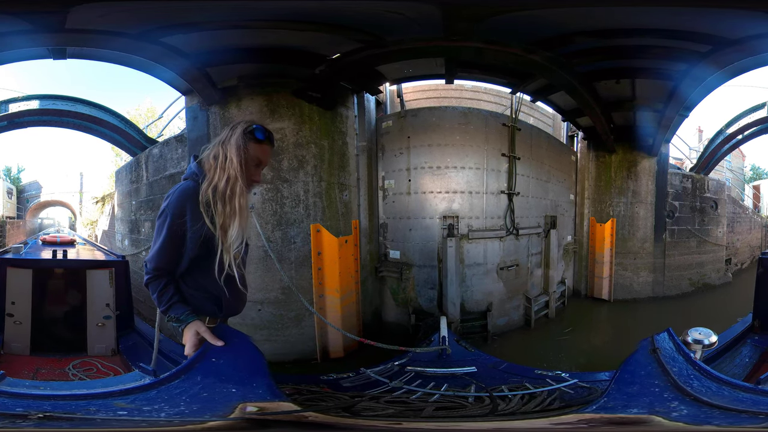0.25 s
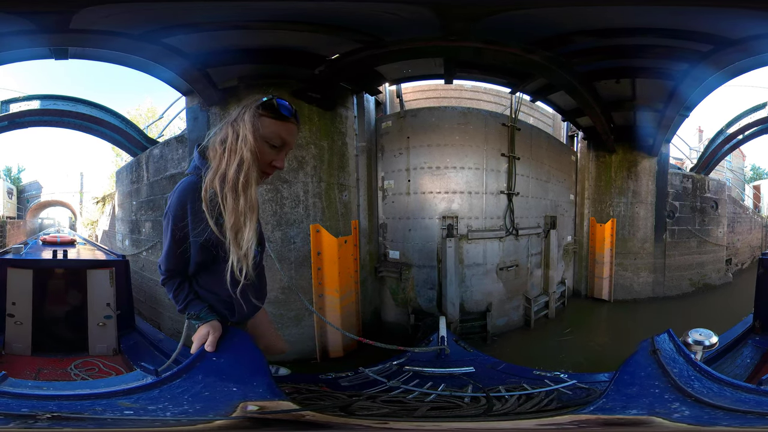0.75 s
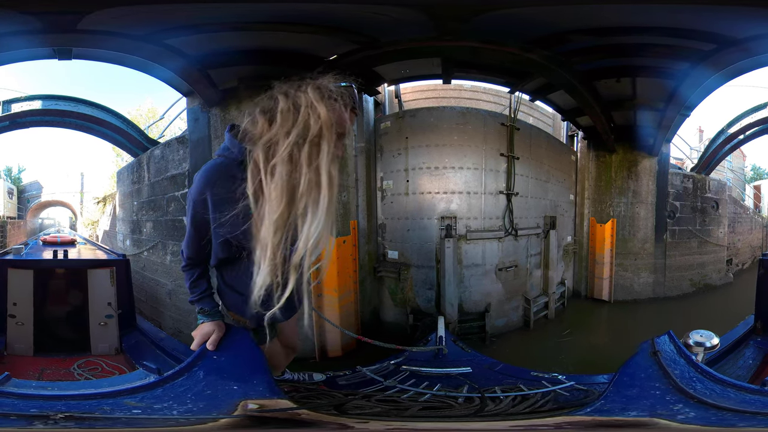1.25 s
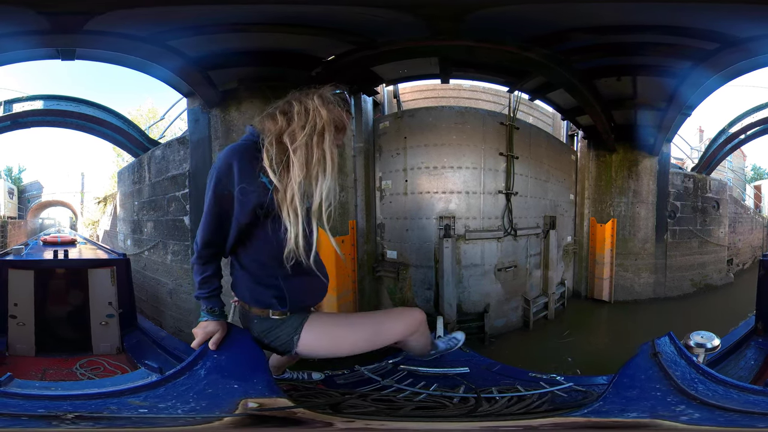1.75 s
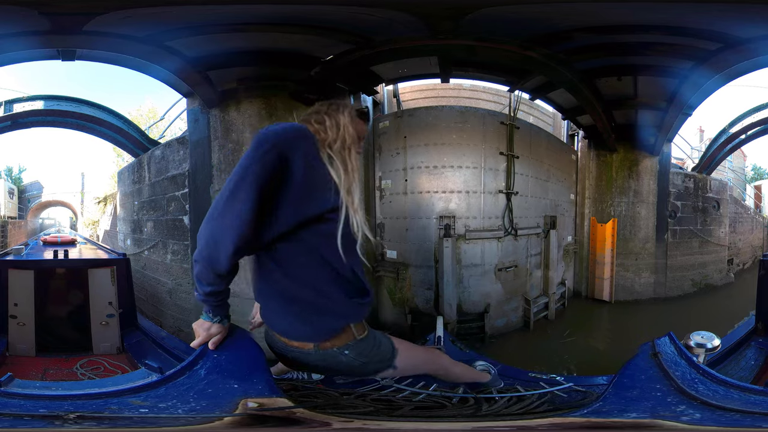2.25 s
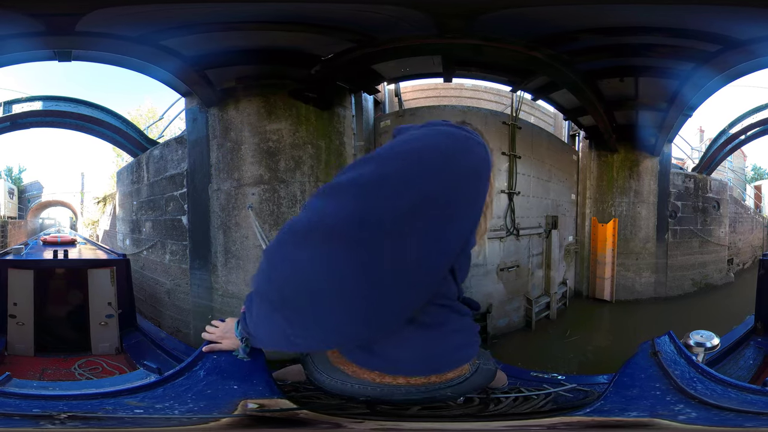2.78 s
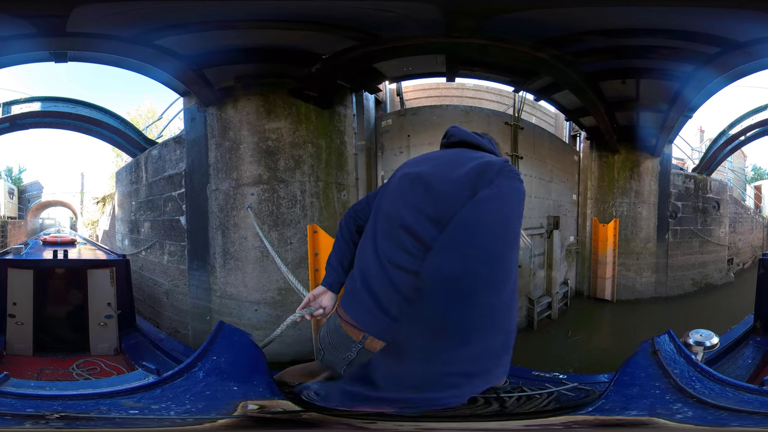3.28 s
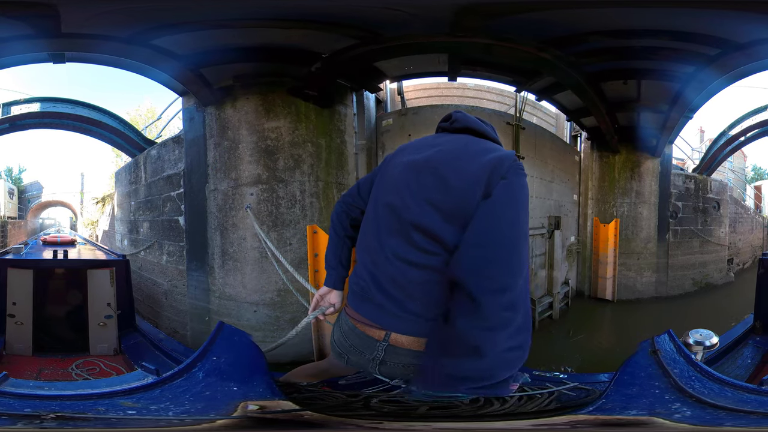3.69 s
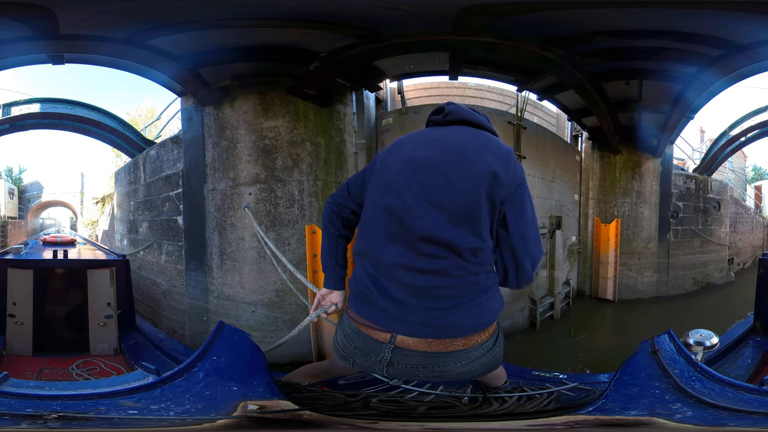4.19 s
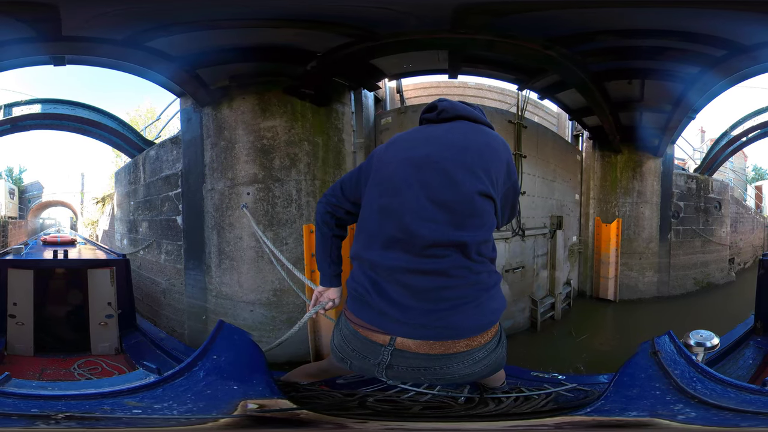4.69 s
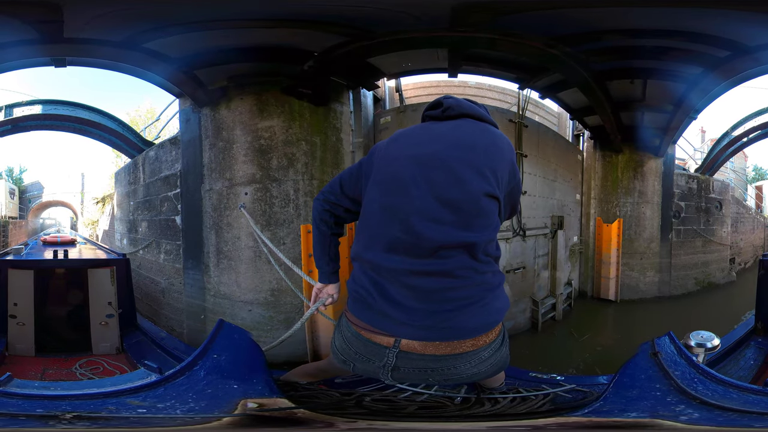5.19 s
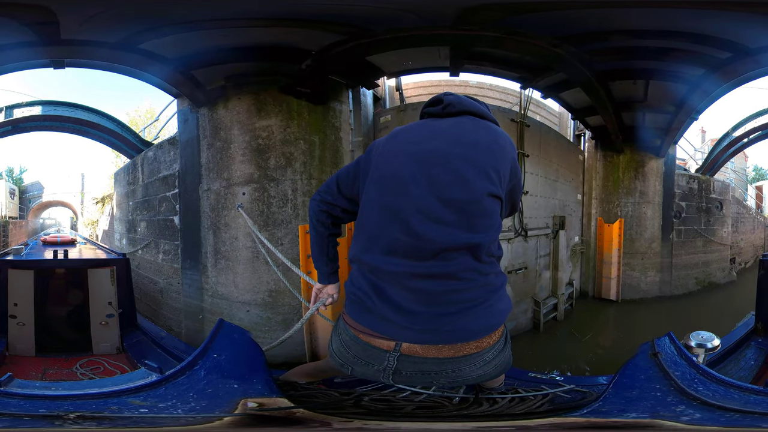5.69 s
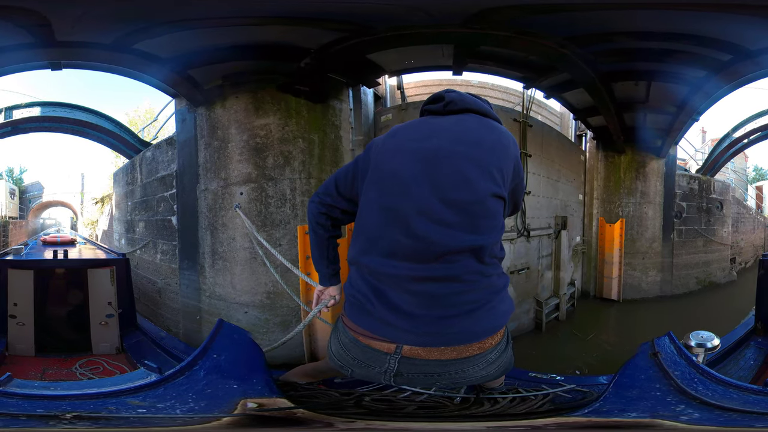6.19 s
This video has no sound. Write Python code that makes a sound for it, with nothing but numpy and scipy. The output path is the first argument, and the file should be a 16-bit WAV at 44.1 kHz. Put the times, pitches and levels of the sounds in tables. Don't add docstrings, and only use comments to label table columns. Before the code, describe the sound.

Deep, rapid engine pulses blend into a continuous rumble under a bridge between stone walls. Thin trickles, spits and little splashes of cooling water run over it, and metal covers rattle softly, more at the start. Late on, the clutch bites: the beat slows, turns lower and rougher, knocks harder and stumbles just before the end. Mono, close to the boat.

```python
import sys
import numpy as np
from scipy import signal
from scipy.fft import rfft, irfft
from scipy.io import wavfile
from scipy.ndimage import uniform_filter1d, map_coordinates

SR = 44100
rng = np.random.default_rng(int(sys.argv[2]) if len(sys.argv) > 2 else 0)


def log_audio(samples):
    frames = np.atleast_2d(samples).T
    limited = np.clip(frames, -1, 1)
    pcm = np.round(limited * 32767).astype(np.int16)
    wavfile.write(sys.argv[1], SR, pcm)


def to_linear_factor(level_db):
    exponent = np.asarray(level_db, float) / 20
    return 10 ** exponent


N = 284312
STEP = 8


def unit(x):
    return x / np.sqrt(np.mean(x ** 2) + 1e-20)


def along(points, hz):
    f, v = np.transpose(points)
    return np.interp(np.log(hz + 1), np.log(f + 1), v)


def curves(rows):
    s, *cols = np.transpose(rows)
    return [np.interp(np.arange(N) / SR, s, c) for c in cols]


def wobble(rate):
    knots = rng.standard_normal(int(N * rate / SR) + 4)
    return map_coordinates(knots, [np.arange(0, N, STEP) * rate / SR])


def fine(coarse):
    return np.interp(np.arange(N), np.arange(0, N, STEP), coarse)


def coloured(x, points):
    m = 2 ** 15
    log_gain = along(points, np.fft.rfftfreq(m, 1 / SR)) * np.log(10) / 20
    cepstrum = irfft(log_gain, m)
    cepstrum[1:m // 2] *= 2
    cepstrum[m // 2 + 1:] = 0
    return signal.fftconvolve(x, irfft(np.exp(rfft(cepstrum)), m))[:len(x)]


def hiss(points, patchy_db, size):
    z = signal.stft(rng.standard_normal(N + 512), nperseg=256)[2]
    field = uniform_filter1d(rng.standard_normal(z.shape), size[0], 0)
    field = uniform_filter1d(field, size[1], 1)
    patchy = signal.istft(z * to_linear_factor(patchy_db * unit(field)), nperseg=256)[1][:N]
    return unit(coloured(patchy, points))


def steadied(x, seconds, depth):
    window = round(seconds * SR)
    power = np.abs(uniform_filter1d(uniform_filter1d(x ** 2, window), window))
    return x * (power / np.mean(x ** 2) + 1e-6) ** (-depth / 2)


# time_s, firing_rate_hz
SPEED = [(0, 30.09), (.65, 30.21), (1.3, 30.06), (1.9, 30.24), (2.6, 30.41), (3.6, 30.26), (4.6, 30.43),
         (5, 30.31), (5.15, 29.91), (5.38, 26.74), (5.5, 25.67), (5.7, 25.18), (6.05, 25.56), (6.25, 24.85),
         (6.44, 24.52)]


def firings():
    return np.cumsum(curves(SPEED)[0]) / SR


# start_s, end_s
GEAR_S = [5.19, 5.35]


def in_gear():
    return np.interp(np.arange(N) / SR, GEAR_S, [0, 1])


# time_s, effort_db, knock_db
EFFORT = [(0, 1, -7), (.35, -1, -1.5), (.65, -1.5, 0), (1.05, -1, -2.5), (1.5, 1.5, -0.5), (2.5, 0, -1),
          (3.4, 1.5, -2), (4.5, 0, -0.4), (5.2, -2, -1.6), (5.35, -6, 1), (5.57, -6, 4.5), (5.9, 0, 3.5),
          (6.1, -7.5, 2.2), (6.22, -1.5, 9), (6.44, -9.5, 2.5)]


def combustion():
    return np.array(curves(EFFORT))


# pitch_hz, level_db per Hz
RUMBLE = [(10, -90), (22, -68), (38, -65), (55, -57), (75, -62), (98, -61), (116, -54.5), (150, -52),
          (195, -53), (225, -66), (265, -63), (300, -67), (400, -85), (600, -120)]
# pitch_hz, level_db per Hz
CLATTER = [(140, -26.5), (230, -5), (268, -3), (296, -4.5), (365, -4.5), (407, -9.5), (466, -6.5),
           (558, -9), (719, -13), (824, -16.5), (1130, -22), (2000, -36), (2600, -52), (4400, -120)]
# pitch_hz, level_db per Hz
RING = [(420, -47), (460, 6.5), (490, -15.5), (520, -7.5), (560, -15), (600, 3), (625, -9.5), (650, 7),
        (690, -9), (730, 8.5), (770, -7.5), (800, -1.5), (1000, -10), (1300, -49.5)]
# time_s, level_db
SHAKE = [
    (0, 5.5),
    (.6, -1.5),
    (1.05, 0.5),
    (1.4, 1),
    (3, 2),
    (4.6, -7),
    (5.25, -4),
    (5.7, 1),
    (6.15, 3.5),
]
# depth_db, moment as a share of the turn
THROB = [
    (.8, .48),
    (2, .63),
]


def chamber():
    gear = in_gear()
    shake_db, = curves(SHAKE)
    turns = firings() / 2
    low_db, mid_db = [db * np.cos(2 * np.pi * (turns - moment)) for db, moment in THROB]

    rumble = steadied(coloured(rng.standard_normal(N), RUMBLE), seconds=0.14, depth=0.11)
    rumble *= np.sqrt(SR / 2) * to_linear_factor(1.5 + 0.1 * shake_db + 0.25 * combustion()[1] + low_db)
    top = signal.sosfiltfilt(signal.butter(2, 149, "high", fs=SR, output="sos"), rumble)
    rumble = rumble + top * (to_linear_factor(-5 * gear) - 1)

    clatter = hiss(CLATTER, 1.0, size=(2, 12))
    knock = signal.sosfiltfilt(signal.butter(2, 400, fs=SR, output="sos"), clatter)
    clatter = clatter + knock * (to_linear_factor(mid_db) - 1)
    ring = to_linear_factor(-13.5 + shake_db) * hiss(RING, 2.2, size=(1, 12))
    clatter_db = -40 - 1.65 * gear + 0.18 * shake_db + 0.27 * fine(wobble(3.6))
    return rumble + to_linear_factor(clatter_db) * (clatter + ring)


def bubbles(count, hz, cycles, spread_db):
    draw = rng.random((count, 3))
    pitch = np.clip(hz * np.exp(.45 * rng.standard_normal(count)), 600, 12000)[:, None]
    u = np.arange(1300) / SR * pitch / cycles
    grain = np.sin(2 * np.pi * cycles * u * (1 + 0.022 * u)) * u * np.exp(-2.5 * u)
    grain *= to_linear_factor(spread_db * 4 * draw[:, 1:2] ** 2)
    index = (draw[:, :1] * N).astype(int) + np.arange(1300)
    return unit(np.bincount(index.ravel(), grain.ravel(), N)[:N])


# pitch_hz, level_db per Hz
GURGLE = [(700, -31), (900, -5.5), (1500, -8.5), (2500, -11.5), (3200, -15), (6000, -64)]
# pitch_hz, level_db per Hz
SPRAY = [(1800, -26), (2500, 0.5), (3500, 3), (4500, 2.5), (5500, -15.5), (9000, -56)]
# pitch_hz, level_db per Hz
MIST = [(3600, -27.5), (4700, -1), (6500, -2.5), (7500, -7), (8400, -17), (9300, -35.5), (10500, -69.5)]
# time_s, level_db
FLOW = [(0, -52), (.25, -54), (1, -54), (1.5, -55.5), (1.75, -53), (2.1, -55), (2.7, -57.5), (3, -56.5),
        (3.5, -57.5), (4, -58), (4.3, -57), (4.55, -57.5), (4.8, -57.5), (5.3, -58), (5.7, -55.5),
        (5.85, -53.5), (6.08, -54), (6.25, -55.5), (6.44, -57)]
# peak_s, level_db over the flow, drop_pitch_hz, length_s
SPITS = [(0.232, 9, 1870, 0.044), (0.309, 9.5, 4400, 0.038), (0.363, 11, 1470, 0.029),
         (0.516, 3.5, 3200, 0.083), (0.755, 7.5, 5300, 0.035), (1.004, 3, 2980, 0.073),
         (1.165, 4, 2830, 0.042), (1.576, 10, 5300, 0.048), (1.659, 9, 4540, 0.047),
         (1.721, -0.5, 4320, 0.09), (1.769, 3, 1690, 0.035), (1.93, 7.5, 3290, 0.032),
         (1.978, 5, 4200, 0.028), (1.984, 1.5, 7100, 0.036), (2.151, 6, 3670, 0.039),
         (2.16, 6.5, 1470, 0.049), (2.221, 0.5, 1360, 0.078), (2.392, 3, 2480, 0.031),
         (2.609, 8, 5800, 0.065), (2.617, 10.5, 1370, 0.039), (2.696, 9, 1480, 0.062),
         (2.813, 9, 2370, 0.051), (2.985, 3.5, 2540, 0.084), (3.056, 8.5, 2250, 0.088),
         (3.077, 6.5, 5660, 0.061), (3.362, 9, 3400, 0.075), (3.533, 8.5, 4530, 0.039),
         (3.709, 5.5, 4800, 0.06), (3.732, 4, 6700, 0.13), (3.846, 5.5, 5350, 0.033),
         (4.091, 8.5, 1260, 0.067), (4.083, 7.5, 3700, 0.035), (4.209, 13.5, 3860, 0.032),
         (4.406, 1.5, 3340, 0.091), (4.45, 5.5, 3040, 0.041), (4.48, 9.5, 1250, 0.043),
         (5.066, 7.5, 1230, 0.061), (5.232, 11.5, 1250, 0.043), (5.342, 5.5, 5830, 0.087),
         (5.392, 5, 1660, 0.051), (5.408, 9.5, 4450, 0.053), (5.545, 6, 6600, 0.035),
         (5.562, 4.5, 2480, 0.21), (5.574, 5.5, 1146, 0.056), (5.839, 5, 4580, 0.033),
         (5.839, 2.5, 2260, 0.075), (5.906, 5.5, 1910, 0.064), (5.997, 3.5, 6090, 0.024),
         (6.008, 10.5, 1114, 0.059), (6.05, 2.5, 3090, 0.19)]
# peak_s, level_db over the flow, drop_pitch_hz, length_s
SPLASHES = [(0.35, -2, 6500, .12), (0.5, 1, 2000, .25), (1.27, 2.5, 7500, .08), (1.4, 3.5, 4200, 0.062),
            (1.81, 0.5, 6500, 0.088), (2.02, 1.5, 6800, 0.089), (2.2, 3.5, 5000, .15),
            (2.45, 2, 5500, 0.15), (2.62, 5, 3300, 0.073), (2.85, 2, 7300, 0.069), (3.08, -3, 4500, 0.11),
            (3.42, 1, 5800, 0.11), (3.42, 2.5, 1700, .15), (3.68, 3.5, 7200, .08), (3.92, 2, 7000, .12),
            (4.27, -3.5, 3000, .08), (4.6, 2.5, 6300, .08), (4.7, 0.5, 5300, 0.072),
            (4.7, -2.5, 2200, 0.18), (5.2, 4, 5500, .07), (5.35, 4.5, 3200, .07), (5.52, 2.5, 4500, .07),
            (5.74, -3.5, 7500, 0.092), (5.9, 1, 4200, .2), (5.95, 1.5, 2000, .4), (6.05, 0.5, 6500, 0.095),
            (6.25, -5, 7500, 0.17), (6.43, 2, 8000, .06)]
# peak_s, level_db, length_s
LULLS = [(0.26, -2, 0.034), (0.844, -3, 0.059), (1.527, -2.5, 0.043), (1.867, -3, 0.1),
         (2.056, -3.5, 0.047), (2.7, -0.5, .06), (3.224, -2.5, .05), (3.468, -2.5, 0.057),
         (4.027, 1.5, .04), (4.211, -5.5, 0.042), (4.622, -4, 0.06), (4.81, -5.5, 0.052),
         (5.308, -2, 0.042), (5.486, -1, 0.085), (5.646, -2.5, 0.077), (6.224, -2, 0.055)]


def water():
    gurgle = hiss(GURGLE, 1.6, size=(4, 10))
    gurgle = gurgle + to_linear_factor(-11.5) * bubbles(count=500, hz=1919, cycles=32, spread_db=2.0)
    fizz = bubbles(count=900, hz=4000, cycles=28, spread_db=2.5)
    spray = hiss(SPRAY, 1.6, size=(4, 9)) + to_linear_factor(-8) * unit(coloured(fizz, SPRAY))
    mist = hiss(MIST, 2.1, size=(5, 8))
    flutter = to_linear_factor(fine(0.8 * wobble(25)))
    stream = to_linear_factor(4) * gurgle + flutter * (spray + to_linear_factor(1.73) * mist)

    hz, t, z = signal.stft(stream, SR, nperseg=256)
    s, db, centre_hz, length = np.transpose(list(SPITS) + list(SPLASHES))[:, :, None]
    age = (t - s) / np.abs(length)
    swell_db = db * np.exp(-(age / np.where(age < 0, 0.34, 0.53)) ** 2)
    sizes = np.exp(-(np.log2((hz + 1) / centre_hz) / 0.47) ** 2)
    s, db, length = np.transpose(LULLS)[:, :, None]
    lull_db = np.sum(db * np.exp(-(2 * (t - s) / length) ** 2), axis=0)
    stream = signal.istft(z * to_linear_factor(sizes.T @ swell_db + lull_db), SR, nperseg=256)[1][:N]
    return to_linear_factor(curves(FLOW)[0]) * stream


# peak_s, pitch_hz, level_db rms
RINGS = [(0.07, 958, -56.5), (0.2, 777, -50.5), (0.12, 600, -49.5), (0.31, 480, -46), (0.32, 358, -41.5),
         (0.56, 462, -49), (1.0, 957, -60.5), (1.05, 465.5, -48), (1.14, 443, -47.5), (1.22, 538, -54),
         (1.5, 530, -44), (1.55, 650, -50), (1.79, 455, -50), (1.38, 732, -49), (1.47, 589, -49),
         (1.62, 715, -47.5), (1.64, 938, -62), (1.85, 807, -54.5), (1.89, 617, -52.5),
         (1.961, 363.7, -46.5), (2.02, 721, -51), (2.16, 361, -44), (2.17, 648, -52.5), (2.9, 484, -45),
         (2.9, 753, -49.5), (2.91, 838, -57), (3.52, 904, -54.5), (3.57, 318.3, -41), (3.65, 492, -50.5),
         (3.81, 629, -50), (3.85, 361.5, -45.5), (4.1, 955, -57), (4.17, 479, -53), (4.52, 715, -52),
         (4.92, 549, -49), (4.97, 317, -46), (5.0, 947, -61), (5.22, 515, -50.5), (5.25, 330, -45.5),
         (5.25, 597, -57), (5.55, 721, -53.5), (5.57, 315.7, -44), (5.75, 510, -52.5), (5.89, 502, -51.5),
         (6.0, 700, -54), (6.1, 690, -49), (6.11, 843, -62.5), (6.12, 662, -49.5), (6.21, 495, -47.5),
         (6.3, 320.6, -46)]


def panels():
    half_length_s, waver_hz = .065, 5
    t = np.arange(0, N, STEP) / SR
    s, hz, db = np.transpose(RINGS)[:, :, None]
    drift = 2 * np.pi * np.cumsum(waver_hz * wobble(12)) * STEP / SR
    swell = to_linear_factor(db) * np.exp(-((t - s) / half_length_s) ** 2)
    notes = swell * np.sin(2 * np.pi * hz * t + drift)
    return np.sqrt(2) * signal.resample_poly(notes.sum(axis=0), STEP, 1)[:N]


# order, level_db at three places, level_db in gear (all rms)
ORDERS_DB = [(1.013, -27, -31, -28.5, -29), (1.5, -35.5, -35.5, -42, -51), (2.026, -37, -49, -38, -27.5),
             (2.537, -44, -44, -45, -47.5), (2.79, -58.5, -57.5, -47.5, -42), (3.0, -33, -32, -38, -39.5),
             (3.54, -50.5, -59, -63, -43.5), (3.712, -45, -37.5, -36.5, -64), (3.965, -39, -35, -37, -53.5),
             (4.286, -43.5, -49.5, -53, -40.5), (4.44, -59, -47, -35.5, -41.5),
             (4.724, -45.5, -40.5, -39, -62.5), (4.991, -31.5, -31.5, -33, -34.5),
             (5.19, -59.5, -46.5, -63, -62), (5.477, -42, -39, -34.5, -55), (5.75, -50, -46, -52, -59.5),
             (6.014, -42.5, -33, -35.5, -58.5), (6.3, -51, -45.5, -52.5, -60), (6.47, -52, -55.5, -53, -45),
             (6.89, -45.5, -58.5, -57, -56), (8.0, -56, -58.5, -58.5, -73.5),
             (8.412, -48.5, -43.5, -46.5, -62.5), (9.0, -42, -42, -40.5, -53), (9.6, -66, -56.5, -55, -69),
             (10.02, -50.5, -61.5, -62, -52.5), (10.336, -52, -50.5, -51, -69),
             (12.015, -60, -51, -51.5, -79.5), (12.96, -56, -72.5, -63.5, -73), (15, -51, -52.5, -60, -65),
             (15.92, -61.5, -53, -55, -76.5), (22.06, -58, -61.5, -72.5, -78.5)]
PLACES_S = [0.68, 2.37, 4.36]
SHAPE = [
    (4.5, .06, 5.6),
    (-4.7, .48, 2.8),
]
FOLLOWS = [
    (0.98, 0.081),
    (-0.2, 0),
    (0.28, 0.74),
]


def engine():
    angle = 2 * np.pi * firings()[::STEP]
    t = np.arange(0, N, STEP) / SR
    gear = in_gear()[::STEP]
    stumble = np.exp(-((t - 6.255) / 0.061) ** 2)
    effort_db = np.array(FOLLOWS) @ combustion()[:, ::STEP] + np.outer([-4, -6, -5], stumble)
    (delay, spread, turn), (delay_gear, spread_gear, turn_gear) = SHAPE
    sound = np.zeros(len(t))
    for order, *place_db, gear_db in ORDERS_DB:
        order = round(4 * order) / 4
        uneven = 8 if order % .5 else 1 + 1.5 * gear
        phase = order * angle + uneven * order ** .5 * (.08 * wobble(2.5) + .07 * wobble(.7))
        hull_lag = 1.5 * np.exp(-((order - 3.8) / .45) ** 2)
        free_db = np.interp(t, PLACES_S, place_db) - (order % 1 == .5) * 2.3
        free = to_linear_factor(free_db) * np.cos(phase + delay * order + spread * order ** 2 + turn - hull_lag)
        loaded = np.cos(phase + delay_gear * order + spread_gear * order ** 2 + turn_gear)
        loaded = to_linear_factor(gear_db) * loaded
        group = np.searchsorted([1.6, 4.1], order)
        waver = to_linear_factor(effort_db[group] + .4 * min(order, 2) * wobble(4) * (order != 9))
        sound += np.sqrt(2) * waver * ((1 - gear) * free + gear * loaded)
    return signal.resample_poly(sound, STEP, 1, padtype="line")[:N]


# peak_s, level_db, pitch_hz
BOOMS = [(0.14, -5.0, 189), (0.31, -0.5, 284), (0.31, 3.5, 237), (0.42, 2.5, 189), (0.42, -4, 318.0),
         (0.63, 3.5, 148.0), (0.66, 0, 110.3), (0.75, 5, 149), (0.82, -8, 184), (0.89, -6, 283),
         (0.99, -2, 186.0), (1.01, -4.5, 118.3), (1.25, 3.0, 203), (1.29, -5, 122), (1.58, -3, 167.6),
         (1.89, -3.5, 266.0), (2.19, 0.5, 89.0), (2.24, 1.5, 190), (2.41, -6, 284), (2.52, 6, 168.7),
         (2.72, -5.5, 284), (2.72, 5.5, 230), (2.84, 6, 92.0), (2.94, 0.5, 289), (3.16, -5, 249),
         (3.24, -4.5, 175.0), (3.29, -2, 299), (3.32, -1.5, 96.2), (3.34, 6, 277.0), (3.53, -0.5, 187),
         (3.55, 3.5, 320.0), (3.78, 3.5, 211), (3.89, 3, 292), (4.06, -1.5, 86.0), (4.18, -5.0, 150),
         (4.23, 5.5, 183.0), (4.33, -3.5, 89.0), (4.34, 1.5, 124), (4.39, 5.5, 251), (4.49, 0, 92.3),
         (4.7, -5, 87), (4.73, -8, 198), (4.75, 5.5, 113.3), (4.85, -8, 258), (4.97, 2.5, 179),
         (4.97, 6, 318.0), (5.21, -8, 85.4), (5.26, -4, 282), (5.26, 5.5, 58.7), (5.27, -3.0, 54.0),
         (5.27, 0.5, 184), (5.27, 3.0, 264.0), (5.27, 3.5, 345), (5.31, 4.5, 109.2), (5.42, -7, 191),
         (5.56, 6.5, 89.0), (5.58, 3, 312.0), (5.92, -10.5, 170), (6.221, 8.5, 175.0), (6.26, 1, 59.0)]
# peak_s,
# level_db, pitch_hz
SWELLS = [(5.4, -3, 53), (5.52, 5, 26), (5.56, -0.5, 51), (5.72, -2.5, 51), (5.85, 4, 51), (6.02, 4.5, 26),
          (6.7, 2, 26), (6.33, -6, 25), (4.1, 2.5, 180), (6.2, 2, 128), (5.2, -2.5, 97), (5.92, -4, 84),
          (6.3, 3, 165), (4.8, 1.5, 190), (3.45, 5, 150), (1.5, 1.5, 230), (0.15, 4, 270), (5.08, -2, 30),
          (6.17, -3, 172), (5.4, 3, 148), (6.2, 3.5, 255), (0.88, 3, 151), (0.45, -2, 151),
          (1.55, 1.5, 170), (4.55, 2, 170), (6.6, -4, 250), (4.8, -3, 250)]


def hull(x):
    half_length_s, half_width_hz = 0.084, 19
    hz, t, z = signal.stft(x, SR, nperseg=8192, noverlap=7168)
    s, db, centre_hz = np.transpose(list(BOOMS) + list(SWELLS))[:, :, None]
    bands = np.exp(-((hz - centre_hz) / half_width_hz) ** 2)
    moments_db = db * np.exp(-((t - s) / half_length_s) ** 2)
    return signal.istft(z * to_linear_factor(bands.T @ moments_db), SR, nperseg=8192, noverlap=7168)[1][:N]


def scene():
    return np.tile(hull(engine() + chamber()) + panels() + water(), (2, 1))


def low_pass(x):
    return signal.sosfilt(signal.butter(12, 9420, fs=SR, output="sos"), x)


def record(dry):
    dry = steadied(dry, seconds=0.019, depth=0.27)
    dry = signal.sosfiltfilt(signal.butter(4, 19, "high", fs=SR, output="sos"), dry)
    return low_pass(dry)


dry = scene()
out = record(dry)
log_audio(out)
```